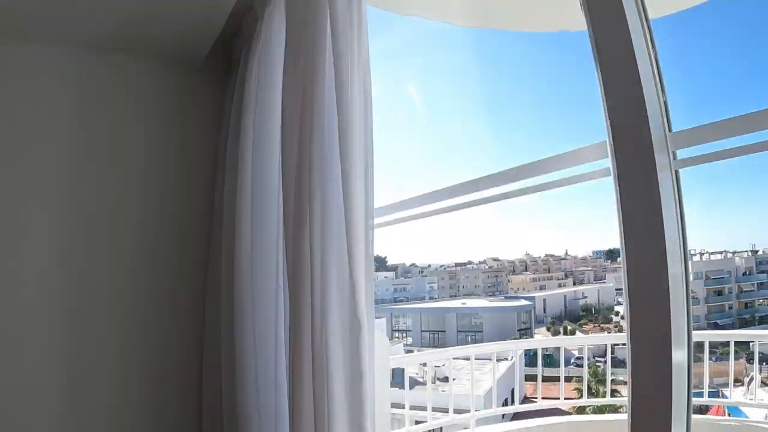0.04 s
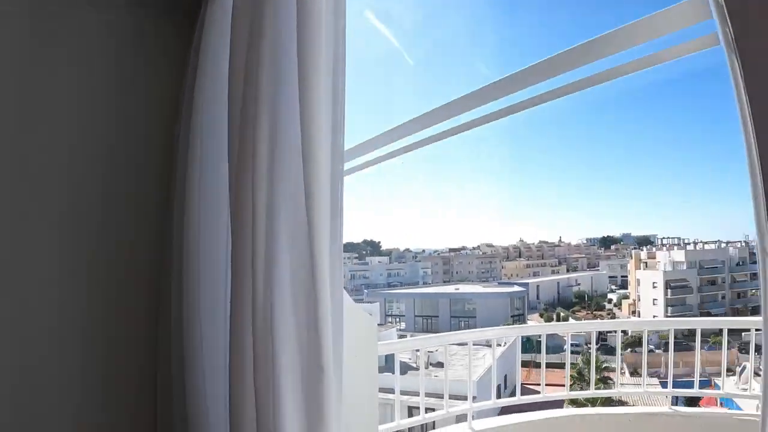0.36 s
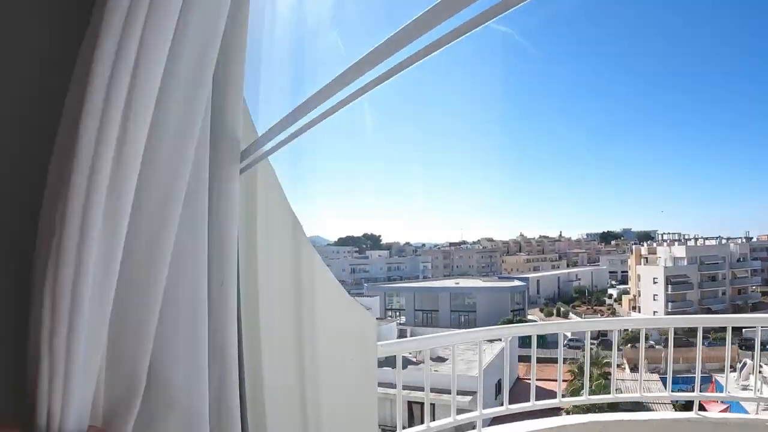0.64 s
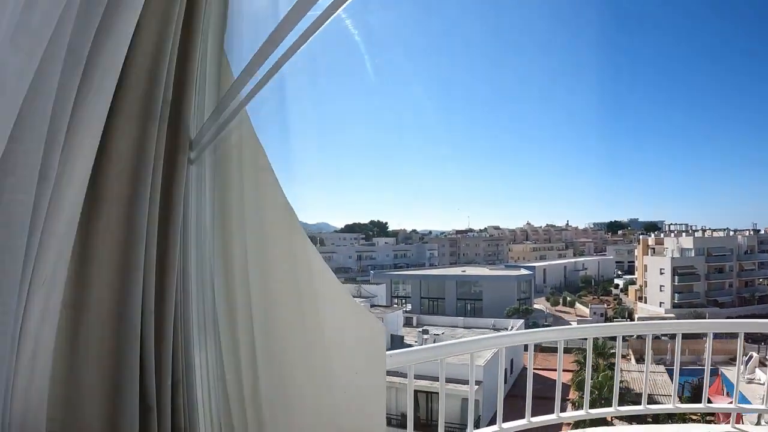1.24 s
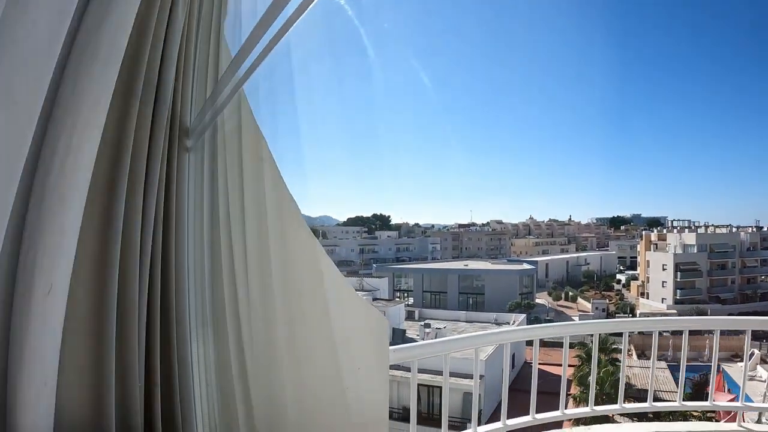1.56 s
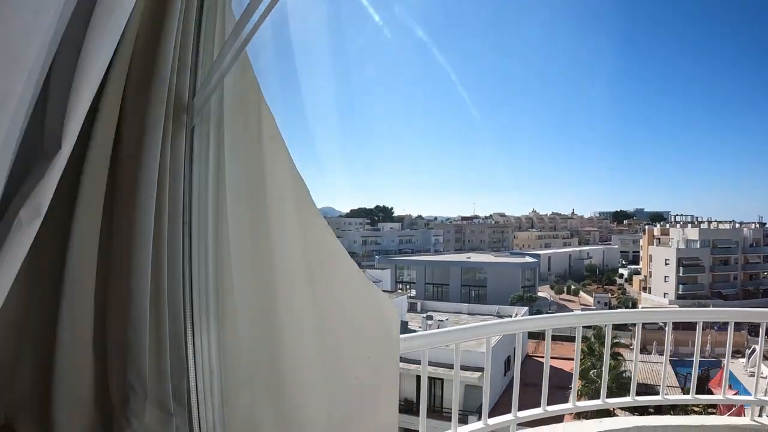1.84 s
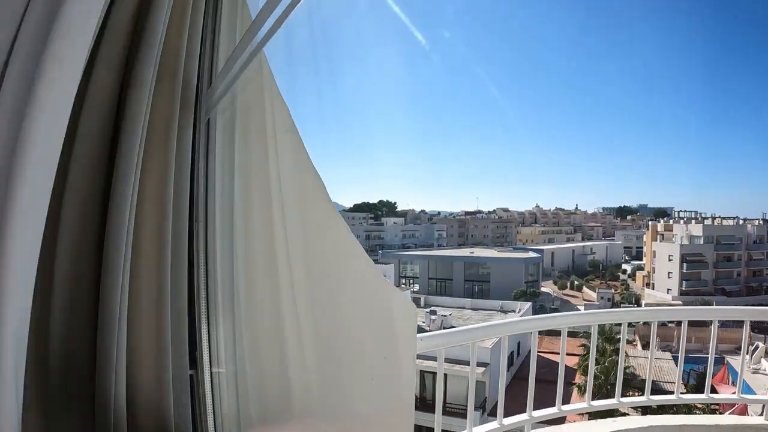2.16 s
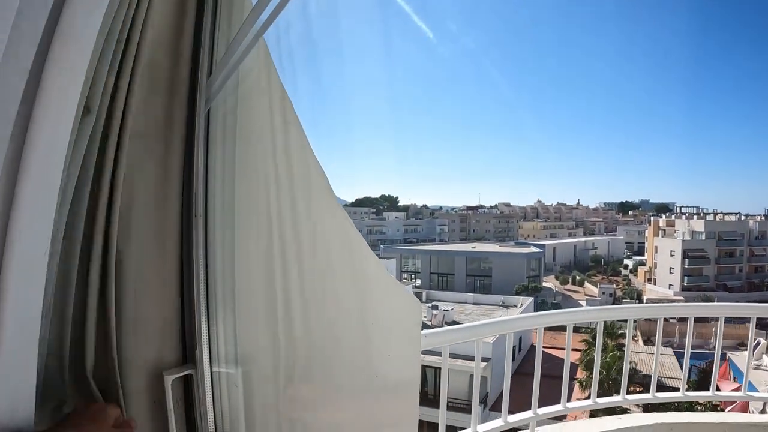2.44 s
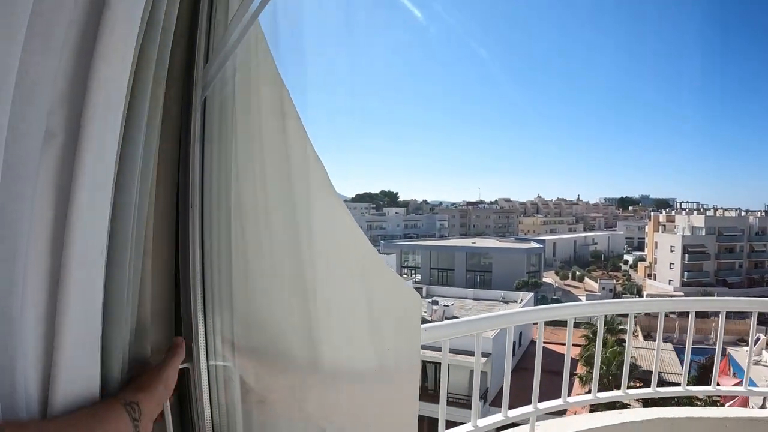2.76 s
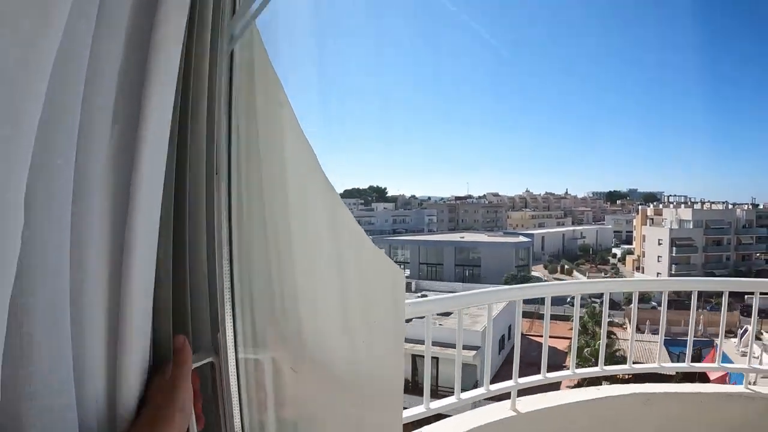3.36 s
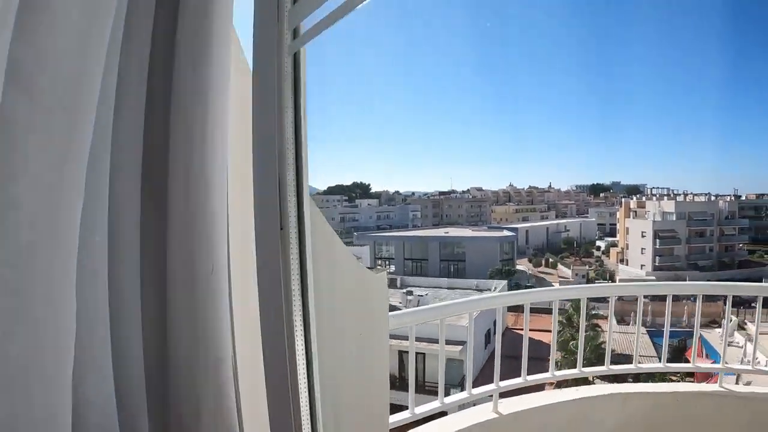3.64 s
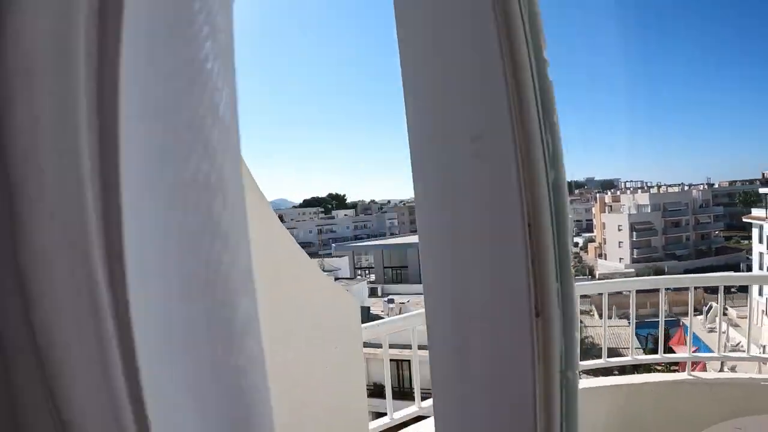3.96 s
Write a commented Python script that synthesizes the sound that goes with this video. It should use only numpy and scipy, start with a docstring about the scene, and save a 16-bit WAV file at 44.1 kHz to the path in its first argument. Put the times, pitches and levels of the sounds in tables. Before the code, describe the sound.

A curtain rustles aside, then a glass door slides open with a low rumble.

```python
"""A curtain and a sliding glass door

In a small room a curtain is pushed aside: the cloth rubs, snaps and flaps in several strokes,
something clacks against the door frame and gliders tick along the rail. Then a heavy glass
door scrapes loose, shudders and rolls along its track, crunching grit as its brush seal hisses."""
import sys
import numpy as np
from scipy import signal
from scipy.fft import rfft, irfft
from scipy.io import wavfile
from scipy.ndimage import uniform_filter1d

SR = 44100
rng = np.random.default_rng(int(sys.argv[2]) if len(sys.argv) > 2 else 0)


def unload_audio(sound):
    """Save the sound as a 16-bit wav file, at the path given as the first command line argument."""
    columns = np.transpose(np.atleast_2d(sound))
    # keep every value between -1 and 1, then stretch to whole-number steps
    steps = np.round(np.clip(columns, -1, 1) * 32767)
    wavfile.write(sys.argv[1], SR, steps.astype(np.int16))


N = 176400
TIME = np.arange(N) / SR
NEAR_ROOM_DB = -9  # echo level of the cloth's folds and the door's knocks


def curtain():
    """Fibres rub under each stroke; folds snap and the heavy cloth flaps."""
    # four strokes of the cloth, each (time [s], swish level [dB], fizz level [dB])
    first_brush = [(0, -63, -73), (.09, -68, -73), (.135, -49.5, -62.5), (.22, -60, -65), (.29, -69, -78),
                   (.43, -86, -79), (.47, -84, -70.5), (.62, -57, -70), (.8, -51, -67.5),
                   (1.08, -65, -69.5)]
    sweep = [(1.08, -60, -71), (1.165, -48, -60), (1.185, -45, -52), (1.23, -39.5, -46),
             (1.262, -42.5, -55), (1.284, -42, -44.5), (1.308, -55, -45), (1.344, -56.5, -54.5),
             (1.44, -50, -57), (1.55, -58.5, -67.5), (1.66, -59, -73)]
    pull = [(1.66, -70, -76), (1.702, -38.5, -48), (1.762, -38.5, -39), (1.814, -35.5, -46.5),
            (1.84, -35.5, -45.5), (1.962, -46.5, -53.5), (2.092, -50, -56), (2.106, -46, -47),
            (2.174, -52, -59), (2.25, -55, -64)]
    gather = [(2.25, -50, -58.5), (2.29, -40.5, -49), (2.426, -37, -42), (2.468, -42, -51),
              (2.612, -46, -50.5), (2.668, -48.5, -59.5), (2.752, -45, -50.5), (2.78, -47, -55.5),
              (2.87, -48.5, -63.5), (2.914, -54.5, -57.5), (3.0, -52, -65)]
    # tone of the soft swish, bright fizz and harsh rasp, each (frequency [Hz], level [dB])
    swish_tone = [(100, -39), (250, 5.5), (450, -3), (620, -2.5), (790, -7), (1030, 3.5), (1350, 1.5),
                  (1650, -1), (2500, -3), (3600, -7), (4400, -9), (5300, -20), (7200, -16), (16000, -54)]
    fizz_tone = [(500, -8.5), (2500, -3), (4200, -6), (5300, -13.5), (6200, -1.5), (7300, 3), (8300, -4),
                 (9400, -4), (10600, -11.5), (12000, -8), (14000, -22.5), (16000, -32)]
    rasp_tone = [(1000, -18), (3000, -4), (5300, 4.5), (7000, -5), (9000, -19), (12000, -10), (16000, -27)]
    # folds snapping and fingers tapping (time [s], level [dB], pitch [Hz])
    snaps = [(0.112, -40, 1440), (1.118, -28.5, 1950), (1.129, -28.5, 905), (1.175, -22, 1740),
             (1.216, -28, 2800), (1.224, -22, 1240), (1.234, -27, 1400), (1.279, -25.5, 1300),
             (1.52, -45, 3840), (1.63, -42, 1800), (1.678, -44, 2500), (1.703, -30.5, 1300),
             (1.827, -23.5, 700), (1.835, -17.5, 774), (1.845, -26.5, 1400), (1.881, -20.5, 1630),
             (2.05, -31.5, 650), (2.102, -30.5, 2800), (2.117, -31.5, 3020), (2.300, -23, 890),
             (2.307, -26.5, 2500), (2.351, -28, 700), (2.381, -24.5, 1100), (2.414, -26.5, 895),
             (2.526, -28.5, 1180), (2.747, -25, 904)]
    # soft flaps (time [s], level [dB])
    flaps = [(1.221, -32), (1.235, -27.5), (1.639, -34), (1.677, -29.5), (1.716, -19.5), (1.825, -17),
             (1.835, -19), (1.861, -30), (2.351, -21), (2.412, -33), (2.521, -39)]
    # a flap's notes, retuned by chance each time (frequency [Hz], level [dB], fade time [s])
    flap_notes = [(71.7, -10.5, 0.14), (164, -5, 0.038), (242, -13, 0.051), (305, -4.5, 0.032),
                  (402, -3.5, 0.06), (580, -20, 0.022)]
    strokes = [*first_brush, *sweep, *pull, *gather]
    rub = friction(swish_tone, 5500, size_db=1, clump_db=0.04, clump_hz=69)
    swish = amp(-1) * level(strokes, 1) * patchy(rub, depth_db=2.5, patch_s=0.011, patch_hz=149)
    speed = level(strokes, 2)
    fizz = amp(1) * speed * friction(fizz_tone, 14000, size_db=0.1, clump_db=1.2, clump_hz=81)
    rasp_gain = amp(-4) * speed * (speed / amp(-47)) ** 0.32  # grows faster than the fizz
    rasp = rasp_gain * friction(rasp_tone, 6000, size_db=0, clump_db=3.8, clump_hz=80)
    folds = np.zeros((2, N))
    for s, db, hz in snaps:
        add(folds, s, amp(db) * tap(hz, fade_s=0.019, rise_s=0.00074, below_db=-1, above_db=-10))
    for s, db in flaps:
        notes = [(hz * rng.uniform(0.838, 1.088), note_db, fade) for hz, note_db, fade in flap_notes]
        add(folds, s, amp(db) * ring(notes, contact_ms=0.88))
    let_go = np.interp(TIME, [2.97, 3.05], [1, 0])
    return let_go * (swish + fizz + rasp) + room(folds, NEAR_ROOM_DB, build_s=0.0084)


def drag():
    """The heavy curtain sticks and slips with a dull flutter as it is hauled."""
    # tugs (start [s], length [s], level [dB])
    tugs = [(.12, .15, -57), (0.456, 0.039, -57), (1.089, 0.14, -40), (1.629, 0.12, -37),
            (2.957, 0.057, -37.5)]
    # tone of the flutter (frequency [Hz], level [dB])
    tone = [(60, -47), (150, -16), (200, 0), (245, 2), (300, 0), (370, -12.5), (480, -28), (1500, -61)]
    rise_s, fall_s = 0.0069, 0.03
    effort = np.zeros(N)
    for s, length, db in tugs:
        rise = np.clip((TIME - s) / rise_s, 0, 1)
        fall = np.exp(-np.maximum(TIME - s - length, 0) / fall_s)
        effort += amp(db) * rise * fall
    return effort * rumble(tone, steady_s=0.0474)


def door():
    """Rollers bump over the track, grit crunches and the brush seal hisses."""
    # the door's travel (time [s], roll level [dB], grit level [dB], seal level [dB])
    travel = [(2.9, -61, -57, -64), (2.994, -36, -46, -66), (3.006, -45, -51, -57),
              (3.122, -37.5, -37.5, -55), (3.224, -41, -46.5, -51.5), (3.236, -48, -46, -51.5),
              (3.312, -34, -47.5, -53), (3.374, -47.5, -48, -48.5), (3.548, -27, -36, -47.5),
              (3.868, -31, -35, -53.5), (3.954, -28, -37, -46.5), (3.99, -31.5, -42.5, -59),
              (4.0, -46, -36, -57)]
    # tone of the rollers, grit and seal, each (frequency [Hz], level [dB])
    roll_tone = [(80, -17), (170, -2), (215, 1), (300, 2.5), (350, -0.5), (410, 2.5), (455, 0.5),
                 (545, -10.5), (660, -5.5), (800, -25), (1500, -24), (5000, -72)]
    grit_tone = [(300, -9), (700, -0.5), (1000, -1.5), (1450, 1.5), (2000, -2.5), (2750, -2), (3200, -9.5),
                 (4500, -14.5), (6500, -18.5), (16000, -64)]
    seal_tone = [(1500, -4), (4000, -0.5), (5300, -2), (7000, 1.5), (8300, -5), (9500, -7), (10600, -14),
                 (12000, -11.5), (14000, -24), (16000, -40)]
    # knocks in the track (time [s], level [dB], pitch [Hz])
    knocks = [(3.039, -33, 3500), (3.063, -22.5, 680), (3.092, -24, 1200), (3.117, -27.5, 2100),
              (3.171, -25.5, 544), (3.262, -30, 600), (3.300, -28, 910), (3.541, -28, 1490),
              (3.563, -33, 1290), (3.733, -24.5, 2500), (3.795, -30, 2500), (3.865, -52, 3000)]
    # two quick hits on a metal fitting, heard as one chink (time [s], level [dB])
    chinks = [(3.579, -23.5), (3.584, -23)]
    # the fitting's notes (frequency [Hz], level [dB], fade time [s])
    fitting_notes = [(3840, -2, 0.022), (4320, 8, 0.016), (4900, -3, 0.031), (5150, -2, 0.02),
                     (6550, -4, 0.018), (7900, -12, 0.017)]
    bumps = friction(roll_tone, 900, size_db=1, clump_db=1, clump_hz=34.6)
    roll = amp(-0.5) * level(travel, 1) * patchy(bumps, depth_db=2, patch_s=0.027, patch_hz=50)
    crunch = friction(grit_tone, 5000, size_db=0.5, clump_db=0.6, clump_hz=60)
    grit = amp(-1.5) * level(travel, 2) * patchy(crunch, depth_db=1, patch_s=0.0052, patch_hz=120)
    seal = amp(1) * level(travel, 3) * friction(seal_tone, 18000, size_db=1, clump_db=1, clump_hz=50)
    hits = np.zeros((2, N))
    for s, db, hz in knocks:
        add(hits, s, amp(db) * tap(hz, fade_s=0.041, rise_s=0.0013, below_db=0.5, above_db=-11))
    for s, db in chinks:
        add(hits, s, amp(db) * ring(fitting_notes, contact_ms=0.05))
    begun = np.interp(TIME, [2.92, 3.0], [0, 1])
    return begun * (roll + grit + seal) + room(hits, NEAR_ROOM_DB, build_s=0.0097)


def shudder():
    """Faint handling rumble, then the shudder and boom of the moving glass."""
    # handling, then the glass, each (time [s], deep rumble level [dB], boom level [dB])
    handling = [(0.03, -38, -84), (0.09, -39, -65), (0.12, -64, -54.5), (0.62, -42, -50.5),
                (0.69, -45, -43), (0.75, -41, -71), (0.87, -48.5, -42.5), (1.05, -40.5, -63),
                (1.12, -46, -44), (1.62, -45.5, -47), (1.65, -41, -40.5), (1.97, -45.5, -42),
                (2.04, -48, -61), (2.2, -55, -50.5), (2.42, -38.5, -41.5), (2.54, -54.5, -54),
                (2.95, -41.5, -39)]
    glass = [(2.97, -41, -34.5), (3.08, -14.5, -22.5), (3.126, -19, -25), (3.394, -23.5, -23.5),
             (3.442, -32.5, -24.5), (3.548, -19.5, -20.5), (3.692, -58, -23.5), (3.714, -22.5, -27),
             (3.948, -30, -19.5), (4.0, -27, -25.5)]
    # tone of the deep rumble and the boom, each (frequency [Hz], level [dB])
    deep_tone = [(8, -11), (18, 2.5), (27, -4), (45, -0.5), (60, -16), (100, -44.5), (300, -96)]
    boom_tone = [(30, -17), (60, -6.5), (77, 7.5), (92, 0), (108, -4.5), (135, -4), (180, -10),
                 (280, -13.5), (600, -39), (2000, -77)]
    shaking = [*handling, *glass]
    deep = amp(1) * level(shaking, 1) * rumble(deep_tone, steady_s=0.127)
    boom = amp(-2.5) * level(shaking, 2) * rumble(boom_tone, steady_s=0.072)
    return deep + boom


def clack():
    """A hard piece hits the door frame and chatters; shorter contacts add a louder tick."""
    # the hit and its bounces (time [s], level [dB], contact time [ms])
    hits = [(0.6413, -26, 0.18), (.6459, -6, 0.11), (.6475, -9, 0.2), (.6512, -6.5, 0.89),
            (0.6546, -21.5, 0.65)]
    # the frame's notes (frequency [Hz], level [dB], fade time [s])
    frame_notes = [(321, -14, 0.061), (436.6, 3, 0.056), (485, 0.5, 0.032), (677, -9.5, 0.034),
                   (1003, -11, 0.037), (1190, -18, 0.022), (1475, -10, 0.046), (1585, -1, .018),
                   (2020, -5, 0.0094), (2100, -10, 0.011), (2340, -8, 0.017), (2470, -11, 0.011),
                   (2680, -18, 0.0071), (3700, -20, 0.0053)]
    out = np.zeros((2, N))
    shortest_ms = min(contact_ms for s, db, contact_ms in hits)
    for s, db, contact_ms in hits:
        add(out, s, amp(db) * ring(frame_notes, contact_ms))
        tick = tap(4100, fade_s=0.014, rise_s=0.00057, below_db=1.5, above_db=-9)
        add(out, s, amp(db - 12) * shortest_ms / contact_ms * tick)
    return room(out, echo_db=-10.5, build_s=0.019)


def rail():
    """Small gliders rattle along the curtain rail and knock together."""
    # the running rattle and the single ticks, each (time [s], level [dB])
    rattle = [(.66, -70), (.69, -38), (.76, -47), (.84, -63), (.9, -51), (1.0, -57), (1.06, -50),
              (1.13, -70)]
    ticks = [(0.565, -53.5), (.719, -41), (.737, -38.5), (.771, -29), (.779, -28.5), (.807, -34),
             (0.818, -30.5), (0.824, -36), (.86, -41), (0.894, -47), (.931, -43.5), (0.971, -41),
             (.990, -34), (1.035, -43.5)]
    # their tones, each (frequency [Hz], level [dB])
    rattle_tone = [(300, -2), (900, -3), (1400, -1.5), (1850, 4), (2150, -6), (2700, -16), (3600, -16.5),
                   (4900, -17), (6200, -15), (9000, -35), (16000, -58)]
    tick_tone = [(800, -23), (1400, -1), (1850, 4), (2500, -19), (3700, -16), (4400, 1.5), (4900, 4.5),
                 (5400, 2.5), (6200, -6.5), (7000, -3.5), (8500, -8.5), (10500, -22), (16000, -34)]
    sliding = friction(rattle_tone, 1500, size_db=3, clump_db=1, clump_hz=60)
    out = level(rattle, 1) * patchy(sliding, depth_db=5.5, patch_s=0.0085, patch_hz=200)
    out *= np.interp(TIME, [0.64, 0.66, 1.13, 1.16], [0, 1, 1, 0])
    for s, db in ticks:
        add(out, s, amp(db) * burst(tick_tone, fade_s=0.047, rise_s=0.0007))
    return room(out, echo_db=-8.5, build_s=0.0062)


def scrape():
    """The edge of the door rubs out of its frame."""
    # strength of the scrape (time [s], level [dB])
    strength = [(3.04, -100), (3.06, -48), (3.09, -56), (3.12, -36.5), (3.16, -44), (3.2, -48), (3.3, -100)]
    # its tone (frequency [Hz], level [dB])
    tone = [(500, -28), (1200, -16), (1700, -3), (2100, 6.5), (2600, -4), (3400, -7), (5000, -12),
            (8000, -21), (16000, -55)]
    return level(strength, 1) * friction(tone, 2700, size_db=0.5, clump_db=2.5, clump_hz=70)


def air():
    """The quiet, steady rush of the room's air."""
    # tone of the air (frequency [Hz], level [dB])
    tone = [(20, 5), (120, 2.5), (260, -5.5), (370, -17), (700, -30), (2000, -31), (5000, -42), (7500, -40),
            (10000, -57), (16000, -66)]
    return amp(-51) * rumble(tone, steady_s=0.23)


def room(x, echo_db, build_s):
    """Adds a tail of scattered echoes, each pitch dying at its own speed."""
    # how long echoes last (frequency [Hz], time to fade by 60 dB [s])
    fades = [(100, 0.59), (300, 0.51), (1000, 0.28), (2000, 0.34), (5000, 0.4), (14000, 0.14)]
    echoes = spread(rng.standard_normal((2, SR)) * (rng.random((2, SR)) < 0.1))
    hz, t, bands = signal.stft(echoes, SR, nperseg=256)
    tail = signal.istft(bands * amp(-60 * t / read(fades, hz)[:, None]), SR, nperseg=256)[1]
    tail *= np.minimum(np.arange(tail.shape[1]) / SR / build_s, 1)
    tail /= np.linalg.norm(tail[0])
    return x + amp(echo_db) * signal.fftconvolve(x, tail, axes=1)[:, :N]


def friction(tone, slips_per_s, size_db, clump_db, clump_hz):
    """Rubbing: tiny slips of uneven size, in clumps, sounding through an object."""
    slips = rng.random(N) < slips_per_s / SR
    sizes = amp(size_db * np.minimum(rng.exponential(1, N), 4) + clump_db * wander(clump_hz))
    return colour(spread(rng.standard_normal((2, N)) * slips * sizes), tone)


def patchy(x, depth_db, patch_s, patch_hz):
    """The contact point shifts, so different pitches stand out from moment to moment."""
    bands = signal.stft(x, nperseg=512)[2]
    patches = rng.standard_normal(bands.shape[1:])
    for axis, size in enumerate([patch_hz * 512 / SR, patch_s * SR / 256]):
        smoothing = np.exp(-1 / max(size, 0.3))
        patches = signal.filtfilt([1], [1, -smoothing], patches, axis=axis, padtype=None)
    patches = np.clip(unit(patches - patches.mean()), -2.5, 2.5)
    return unit(signal.istft(bands * amp(depth_db * patches), nperseg=512)[1][:, :N])


def rumble(tone, steady_s):
    """Low noise with its slow swells evened out."""
    x = colour(spread(rng.standard_normal((2, N))), tone)
    power = uniform_filter1d((x ** 2).mean(0), max(int(steady_s * SR), 2))
    return x / np.sqrt(power + 1e-6)


def ring(notes, contact_ms):
    """A struck object's notes each fade 60 dB in their fade time; a longer contact dulls them."""
    t = np.arange(SR // 4) / SR
    x = np.zeros(len(t))
    for k, (hz, db, fade_s) in enumerate(notes):
        sign = (-1) ** (k // 2)
        dulling = np.hypot(1, np.pi * hz * contact_ms / 1000)
        x += sign * amp(db - 60 * t / fade_s) * np.sin(2 * np.pi * hz * t) / dulling
    return x / abs(x).max()


def tap(hz, fade_s, rise_s, below_db, above_db):
    """A crunch whose level changes by so many dB an octave below and above a pitch."""
    freqs = np.geomspace(40, SR / 2, 40)
    octaves = np.log2(freqs / hz)
    db = below_db * np.maximum(-octaves, 0) + above_db * np.maximum(octaves, 0)
    db -= 10 * np.log10(1 + (freqs / 7450) ** 6)  # softens the highest treble
    return burst(np.transpose([freqs, db]), fade_s, rise_s)


def burst(tone, fade_s, rise_s):
    """A short puff of noise that fades 60 dB in fade_s; peak 1."""
    t = np.arange(4096) / SR
    x = colour(spread(rng.standard_normal((2, len(t)))), tone)
    x *= amp(-60 * t / fade_s) * (1 - np.exp(-(t / rise_s) ** 2))
    return x / abs(x).max()


def spread(pair):
    """Two unrelated signals become a partly alike left and right."""
    # how alike the two sides are (frequency [Hz], likeness [0 to 1])
    likeness = [(50, 0.99), (250, 0.98), (600, 0.9), (1500, 0.78), (4000, 0.75), (8000, 0.89), (12000, .6)]
    n = pair.shape[-1]
    alike = np.clip(read(likeness, np.fft.rfftfreq(n, 1 / SR)), 0, 1)
    mid, side = rfft(pair) * np.sqrt([(1 + alike) / 2, (1 - alike) / 2])
    return irfft([mid + side, mid - side], n)


def colour(x, tone):
    """Filters a sound by a tone table, at strength 1."""
    n = x.shape[-1]
    gains = amp(read(tone, np.fft.rfftfreq(n, 1 / SR)))
    return unit(irfft(rfft(x) * gains, n))


def wander(rate_hz):
    """A smooth random drift of strength 1."""
    smoothing = (1 + (np.fft.rfftfreq(N, 1 / SR) / rate_hz) ** 2) ** 2
    return unit(irfft(rfft(rng.standard_normal(N)) / smoothing, N))


def amp(db):
    """Decibels to gain."""
    return 10 ** (np.asarray(db) / 20)


def unit(x):
    """Scales to an average strength (rms) of 1."""
    return x / np.sqrt(np.mean(x ** 2) + 1e-20)


def read(table, hz):
    """Reads between a table's frequencies, with octaves evenly spaced."""
    freqs, values = np.transpose(table)
    return np.interp(np.log(hz + 1), np.log(freqs + 1), values)


def level(rows, column):
    """Gain over time from one dB column of a table."""
    rows = np.array(rows)
    return amp(np.interp(TIME, rows[:, 0], rows[:, column]))


def add(mix, s, sound):
    """Mixes a sound in at s seconds."""
    part = mix[..., round(s * SR):][..., :sound.shape[-1]]
    part += sound[..., :part.shape[-1]]


def scene():
    """The curtain, then the door, over the quiet air of the room."""
    return curtain() + drag() + clack() + rail() + scrape() + door() + shudder() + air()


def record(dry):
    """Two slightly unequal microphones, with the highest treble cut off."""
    # balance of the microphones (frequency [Hz], left minus right [dB])
    balance = [(50, -0.8), (150, -1.8), (400, 0), (1000, 0), (4000, 0.4), (8000, 1.2), (12000, 4)]
    lean_db = read(balance, np.fft.rfftfreq(N, 1 / SR))
    x = irfft(rfft(dry) * amp([lean_db / 2, -lean_db / 2]), N)
    treble_cut = signal.firwin(511, cutoff=15700, window=("kaiser", 9), fs=SR)
    return signal.oaconvolve(x, treble_cut[None], "same")


dry = scene()
out = record(dry)
unload_audio(out)
```